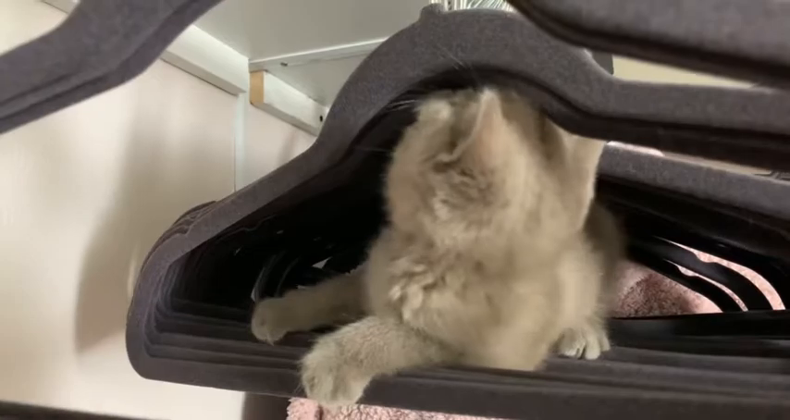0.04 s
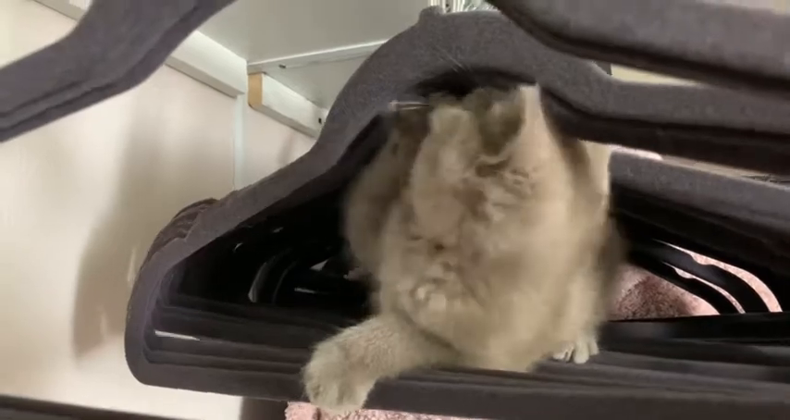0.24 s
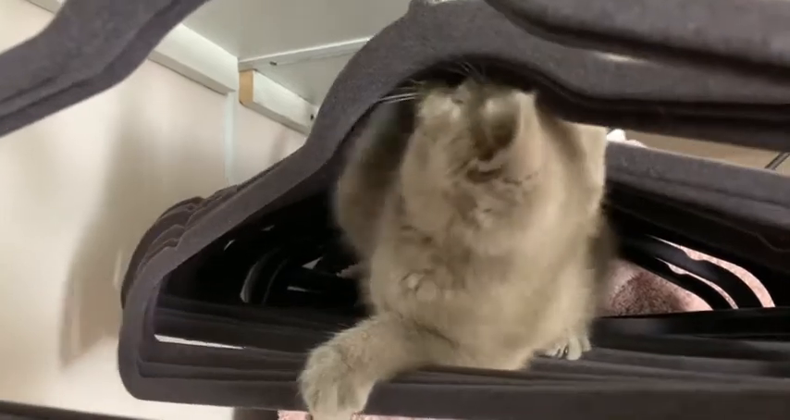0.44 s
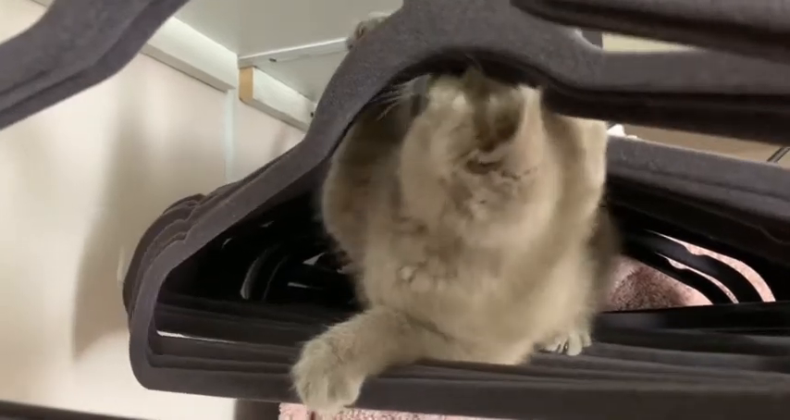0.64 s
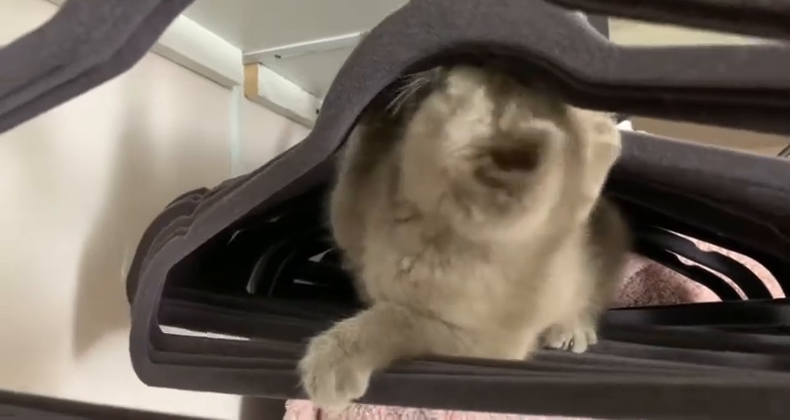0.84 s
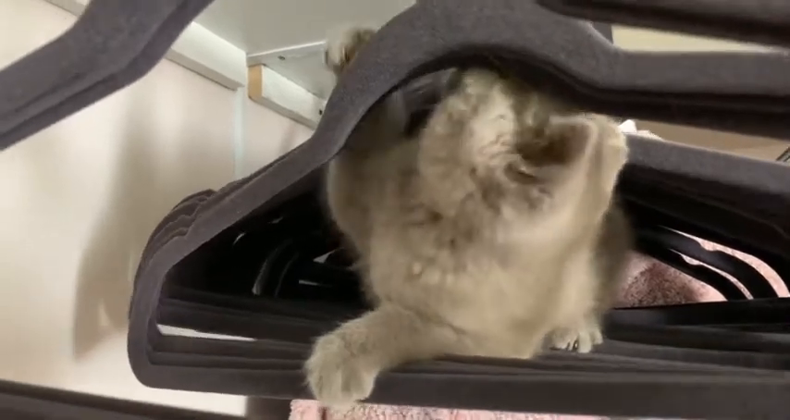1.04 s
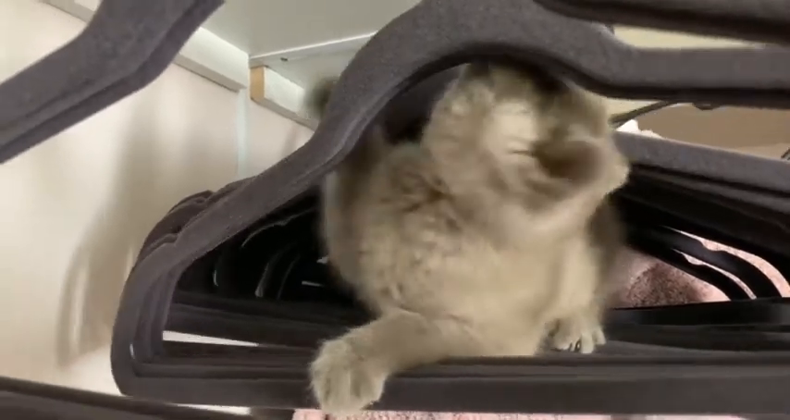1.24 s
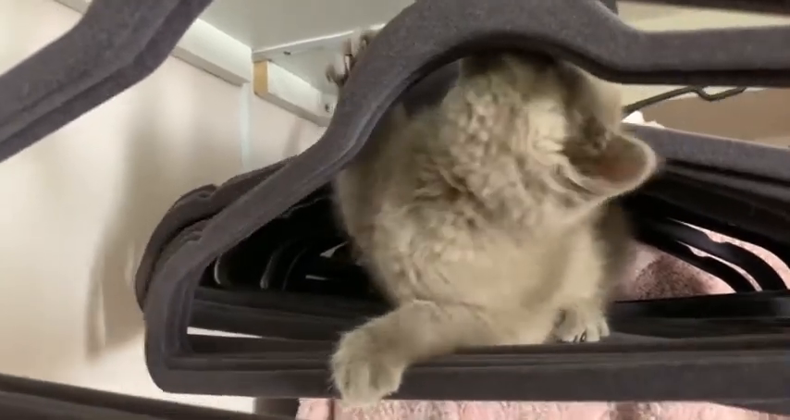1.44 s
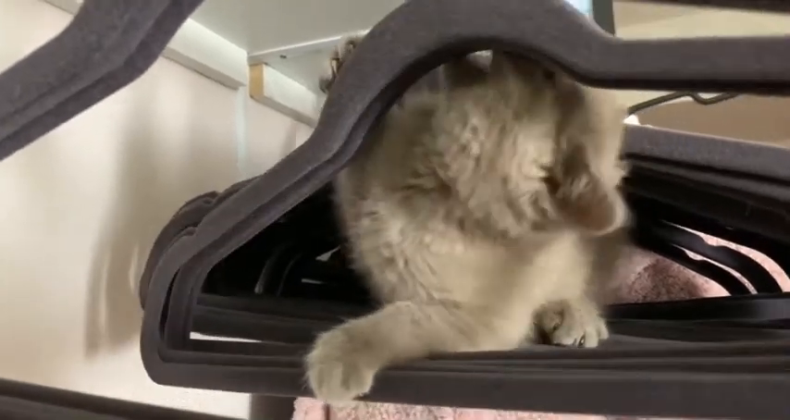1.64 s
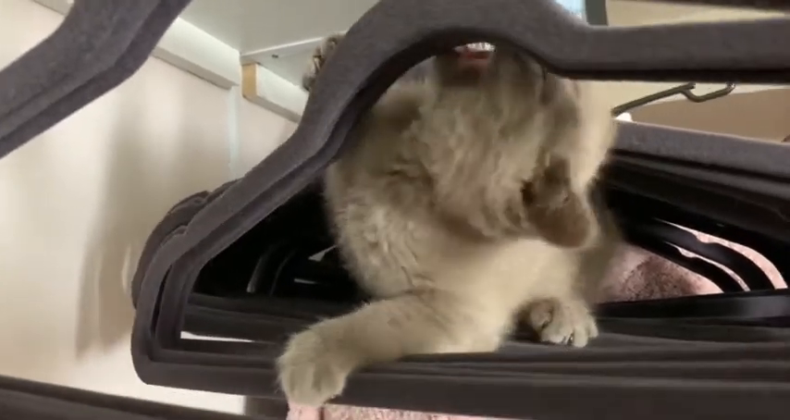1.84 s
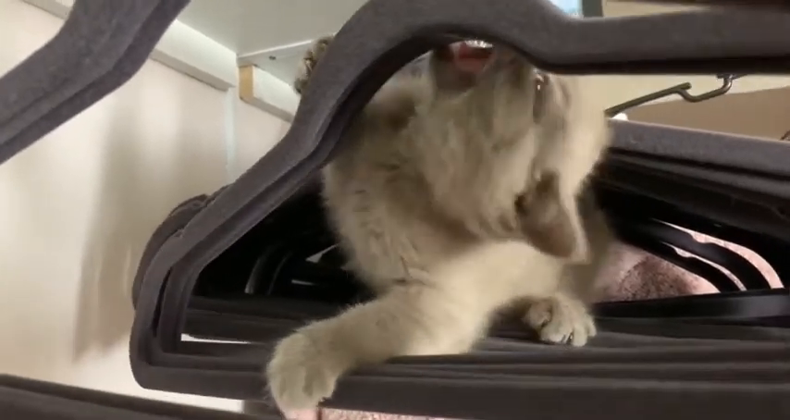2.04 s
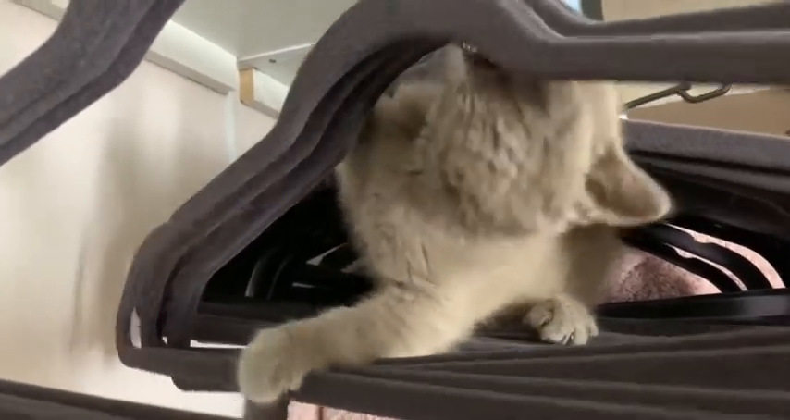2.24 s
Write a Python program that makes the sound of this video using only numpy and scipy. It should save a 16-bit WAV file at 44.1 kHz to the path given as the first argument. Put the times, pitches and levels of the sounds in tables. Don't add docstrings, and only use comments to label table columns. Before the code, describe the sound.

Close phone pickup of hangers clicking in a closet: a hard early cluster with a thin wire ring, scattered small rattles, a bright double clack midway, then near quiet with soft paw thuds and distant rising hum.

```python
import sys
import numpy as np
from scipy import signal
from scipy.fft import rfft, irfft
from scipy.io import wavfile
from scipy.ndimage import uniform_filter1d

SR = 44100
rng = np.random.default_rng(int(sys.argv[2]) if len(sys.argv) > 2 else 0)


def gain_from_decibels(decibels):
    exponent = np.asarray(decibels, float) / 20
    return 10 ** exponent


def output_pcm(signal):
    pcm = np.clip(np.atleast_2d(signal).T, -1, 1) * 32767
    wavfile.write(sys.argv[1], SR, np.round(pcm).astype(np.int16))


N = 101429

# t/s, peak level/dB, contact/ms, upper against lower tones/dB
HOOK_HANGER_KNOCKS = [(.1953, -35, 1.6, -10), (.2013, -27, .4, 0), (.203, -36, 1.5, -3),
                      (.2066, -33, 1.2, 8), (.2095, -39, 2, 0), (.2148, -15, 1, 5), (.2165, -14, 1.2, -6),
                      (.2186, -21, .9, -14), (.2208, -30, 1.2, -8), (.2255, -27, .4, 10),
                      (.2285, -35, 1, -8), (.238, -37, 1.2, -10), (.25, -44, 1.2, -10),
                      (1.0175, -39, 1.5, -6), (1.0195, -30, 1.6, -14)]
# t/s, peak level/dB, contact/ms, upper against lower tones/dB
RATTLES = [(.3151, -41, .4, -3), (.316, -44, .4, -3), (.3168, -41, .3, -5), (.3187, -37, .2, -3),
           (.3206, -46, .4, -5), (.3218, -44, .3, -6), (.3236, -42, .6, 0), (.325, -33, .3, -7),
           (.3279, -41, .2, -3), (.329, -46, .5, -4), (.331, -35, .15, -5), (.3325, -39, .3, -3),
           (.3332, -31, .15, -6), (.3345, -43, .6, -6), (.3414, -35, .4, -8), (.3437, -45, .6, -8),
           (.442, -41, .15, -3), (.4516, -24, .1, -2), (.4524, -39, 1.4, 0), (.4828, -44, .6, -6),
           (.484, -38, .5, -4), (.4892, -38, .25, -2), (.4935, -37, .6, -4), (.4955, -42, 1.5, -2),
           (.559, -34, .8, -3), (.5605, -40, .6, -3), (.5645, -42, .6, 0), (.5665, -43, .5, 0),
           (.5685, -34, .7, 5), (.575, -45, 2.5, 0), (.581, -45, 2.5, 2), (.033, -53, 2.5, -6),
           (.1815, -47, 1.5, 0), (.755, -54, 1.2, 2), (.783, -54, 2.2, 4), (1.171, -50, 3.5, -6),
           (1.176, -50, 1.5, -4), (1.1825, -44, 1.2, -6), (1.205, -54, 3.5, -6), (1.3888, -43, .8, -5),
           (1.3908, -44, 1.2, -3), (1.4235, -52, 1, 0), (1.33, -54, 1.5, -3), (.8365, -50, 3, -2),
           (2.292, -48, 2.5, 5)]
# t/s, peak level/dB, contact/ms, upper against lower tones/dB
CLACKS = [
    (1.0069, -17, .7, 10),
    (1.0086, -17, .5, 5),
    (1.0105, -26, .9, 6),
    (1.013, -37, 2.5, 3),
    (1.0222, -36, .6, 6),
    (1.026, -42, 4, 4),
    (1.034, -43, 4, 4),
    (2.2172, -35, .3, 3),
    (2.219, -31, .15, 3),
    (2.235, -41, .9, 3),
]
# t/s, peak level/dB, contact/ms, f/Hz
BUMPS = [(.176, -54, 12, 1000), (.205, -49, 12, 950), (.19, -50, 12, 4000), (.213, -50, 6, 1000),
         (.216, -42, 6, 3100), (.228, -52, 9, 1300), (.198, -49, 14, 4200), (.224, -52, 14, 3200),
         (.32, -57, 14, 3000), (.835, -50, 9, 4300), (.84, -57, 9, 1600), (1.329, -55, 2.5, 3000),
         (1.389, -54, 3.5, 1500), (1.4225, -53, 2, 3600), (2.0015, -53, 1.5, 5800), (2.017, -57, 3.5, 3200),
         (2.022, -59, 8, 1100), (2.212, -52, 8, 4000), (2.231, -54, 6, 4400), (1.0075, -34, 2.2, 4700),
         (1.021, -47, 8, 4500), (1.034, -53, 12, 4800), (1.013, -42, 5, 4900), (1.011, -50, 6, 1700),
         (1.008, -57, 8, 900), (1.172, -58, 9, 1500), (1.175, -54, 8, 4000), (.485, -56, 9, 1800),
         (.559, -46, 4, 5800), (.56, -51, 9, 2200), (.562, -56, 9, 900), (.322, -54, 11, 1600),
         (.94, -55, 50, 4700), (.668, -57, 5, 300)]
# f/Hz, width/Hz, level/dB
KNOCK_LOWER = [(2600, 3000, -28), (4600, 700, -15), (6350, 400, -10), (6800, 600, 0), (7550, 600, -2)]
KNOCK_UPPER = [(9300, 700, -12), (10700, 800, 2), (11500, 800, 0), (14800, 1100, -6)]
# f/Hz, width/Hz, level/dB
RATTLE_LOWER = [(2600, 3000, -24), (5000, 1600, -9), (6900, 1000, -1), (8100, 1000, 0)]
RATTLE_UPPER = [(9600, 800, -3), (10700, 1000, 2), (11700, 900, -3), (14800, 1500, -10)]
# f/Hz, level/dB, time to fade by 60 dB/s
HOOK_TONES = [(4850, -39, .08), (6740, -27, .045), (7570, -35, .045), (6330, -45, .12), (7160, -44, .13),
              (9184, -53, .2), (14850, -41, .13), (1655, -57, .16)]
# f/Hz, level/dB, time to fade by 60 dB/s
HOOK_PAIR = [(4759, -50, .26), (4815, -51, .24)]
# t/s, level/dB, f/Hz, time to fade by 60 dB/s
THUDS = [(.225, -56, 250, .12), (.57, -52, 200, .15), (.66, -52, 95, .1), (1.03, -55, 200, .15),
         (1.868, -43, 125, .07), (1.866, -56, 400, .04), (2.017, -54, 3200, .04), (1.389, -51, 3300, .05),
         (2.217, -55, 4900, .05), (.484, -51, 5700, .03), (.559, -48, 5700, .03), (1.008, -55, 1150, .07),
         (.2, -60, 800, .1), (.185, -57, 960, .13), (.205, -58, 1100, .1)]
# t/s, level/dB
FUR_EFFORT = [(0, -65), (.12, -68.5), (.2, -54.5), (.28, -61.5), (.4, -87), (.5, -64.5), (.62, -64.5),
              (.72, -81), (.84, -67.5), (.97, -55), (1.07, -65), (1.14, -100), (1.2, -81), (1.34, -61.5),
              (1.6, -76), (1.95, -65.5), (2.15, -62.5), (2.3, -64)]
# f/Hz, level/dB
FUR_COLOUR = [(1500, -16), (4000, -7.5), (6000, -8), (7000, 3.5), (8200, 2), (9500, -1), (11000, 1.5),
              (16000, -12.5)]
# t/s, f/Hz, level/dB
MOTOR = [
    (0, 108, -67),
    (1, 109, -74),
    (1.25, 113, -68.5),
    (1.44, 120, -65),
    (1.85, 123, -59.5),
    (2.3, 125.5, -60.5),
]
# f/Hz, level/dB
ROOM_COLOUR = [(22, -6.5), (45, 7.5), (125, -3.5), (180, -10.5), (800, -20), (4000, -27.5), (8000, -23.5),
               (16000, -26.5)]
# f/Hz, level/dB
PORT = [(11900, 0), (12500, -5), (13300, -14), (14800, -6), (16000, -12)]


def hangers():
    out = np.zeros(N + 4096)
    for s, db, ms, bright_db in HOOK_HANGER_KNOCKS:
        add(out, s, db, body(contact(ms), bright_db, KNOCK_LOWER, KNOCK_UPPER))
    for s, db, ms, bright_db in RATTLES + CLACKS:
        add(out, s, db, body(contact(ms), bright_db, RATTLE_LOWER, RATTLE_UPPER))
    for s, db, ms, hz in BUMPS:
        add(out, s, db, band(contact(ms), hz, 0.52 * hz))
    return out[:N]


def contact(ms):
    t = np.arange(4096) / SR / (ms / 2000)
    press = t * np.exp(1 - t)
    chatter = .25 * np.minimum(t, 1) * np.exp(-t / 3)
    grit = rng.standard_normal(4096) * (press + chatter)
    grit[np.argmin(abs(t - 1))] += 1.2
    return grit


def body(x, bright_db, lower, upper):
    low = sum(gain_from_decibels(db) * band(x, hz, width) for hz, width, db in lower)
    high = sum(gain_from_decibels(db) * band(x, hz, width) for hz, width, db in upper)
    return low + gain_from_decibels(bright_db) * high


def band(x, hz, width):
    b, a = signal.iirpeak(hz, hz / width / 1.38, fs=SR)
    return signal.lfilter(b, a, signal.lfilter(b, a, x))


def add(out, s, db, x):
    i = int(s * SR)
    out[i:i + len(x)] += x * gain_from_decibels(db) / abs(x).max()


def closet(hits):
    t = np.arange(8192) / SR
    t60_s, level_db = 0.093, -13
    wash = rng.standard_normal(8192) * gain_from_decibels(-60 * t / t60_s) * (t > .002)
    wash = wash / np.sqrt(np.sum(wash ** 2))
    return gain_from_decibels(level_db) * signal.fftconvolve(hits, wash)[:N]


def hook():
    return sum(ring(.2155, hz, db, t60, rise_s=0.00025) for hz, db, t60 in HOOK_TONES + HOOK_PAIR)


def rail():
    return sum(ring(s, hz, db, t60, rise_s=0.0019) for s, db, hz, t60 in THUDS)


def ring(s, hz, db, t60, rise_s):
    t = np.maximum(np.arange(N) / SR - s, 0)
    return gain_from_decibels(db - 60 * t / t60) * (1 - np.exp(-t / rise_s)) * np.sin(2 * np.pi * hz * t)


def fur():
    hiss = rng.standard_normal(N)
    flicker_db = 1.3 * walk(86)
    rub = coloured(hiss * gain_from_decibels(flicker_db), FUR_COLOUR)
    return unit(rub) * gain_from_decibels(curve(FUR_EFFORT, order=1))


def motor():
    hz = curve(MOTOR, order=1) * (1 + .012 * walk(10))
    level_db = curve(MOTOR, order=2) + 1.2 * walk(12)
    return np.sqrt(2) * gain_from_decibels(level_db) * np.sin(2 * np.pi * np.cumsum(hz) / SR)


def room():
    return unit(coloured(rng.standard_normal(N), ROOM_COLOUR)) * gain_from_decibels(-59.5 + .7 * walk(9))


def coloured(x, table):
    f = np.arange(N // 2 + 1) * SR / N + 1
    hz, db = np.array(table).T
    return irfft(rfft(x) * gain_from_decibels(np.interp(np.log(f), np.log(hz), db)), N)


def curve(table, order):
    points = np.array(table)
    return np.interp(np.arange(N) / SR, points[:, 0], points[:, order])


def walk(rate):
    k = int(SR / rate)
    return unit(uniform_filter1d(uniform_filter1d(rng.standard_normal(N), k), k))


def unit(x):
    return x / np.sqrt(np.mean(x ** 2))


def scene():
    hits = hangers()
    return (hits + closet(hits) + hook() + rail() + fur() + motor() + room())[None]


def thin_top(x):
    from_hz, limit_db, attack_db = 12450, -11.5, 9
    f, _, z = signal.stft(x, SR, nperseg=2048)
    power = uniform_filter1d(abs(z) ** 2, size=10, axis=0)
    treble = np.median(power[(f > 6000) & (f < 12000)], axis=0)
    limit = np.sqrt(treble * np.median(treble)) * gain_from_decibels(2 * limit_db)
    attack = treble > np.roll(treble, 2) * gain_from_decibels(2 * attack_db)
    keep = (f[:, None] < from_hz) | (power > limit) | attack
    return signal.istft(z * np.maximum(keep, .03), SR, nperseg=2048)[1][:N]


def band_limit(x):
    return signal.sosfilt(signal.butter(12, 16510, fs=SR, output="sos"), x)


def record(dry):
    top_cut = signal.ellip(8, .2, 70, 16200, fs=SR, output="sos")
    cut = signal.sosfilt(top_cut, coloured(dry, PORT))
    mix = thin_top(cut[0])[None]
    return band_limit(mix)


dry = scene()
out = record(dry)
output_pcm(out)
```